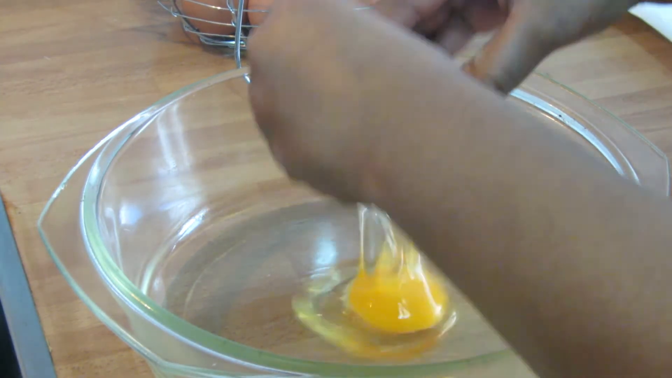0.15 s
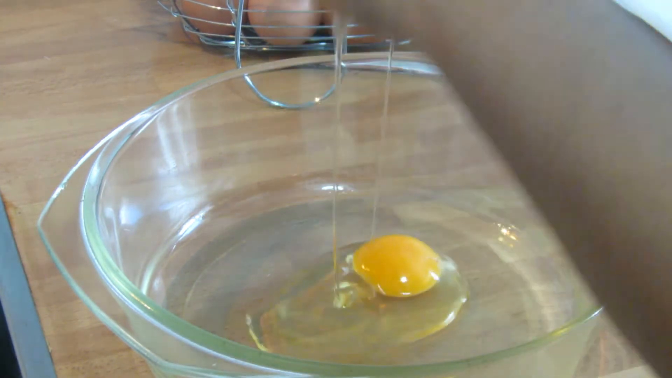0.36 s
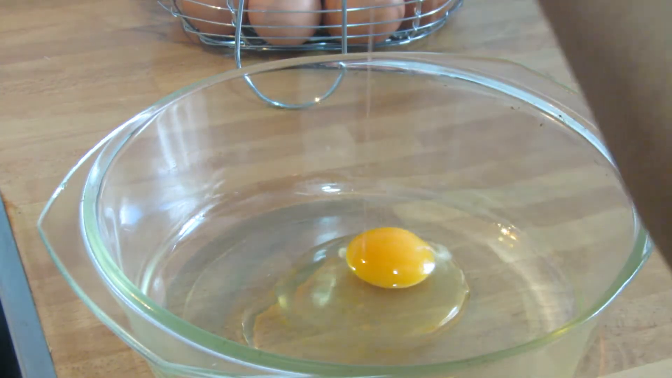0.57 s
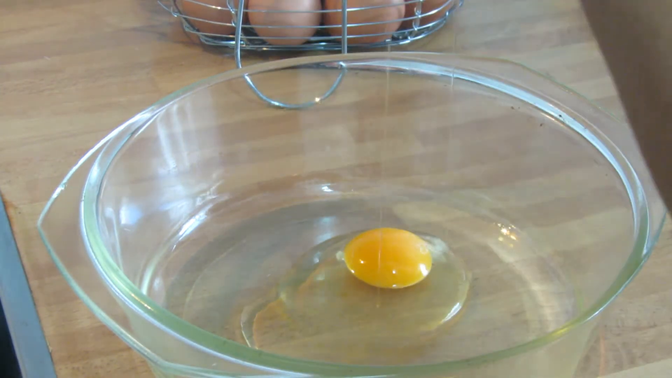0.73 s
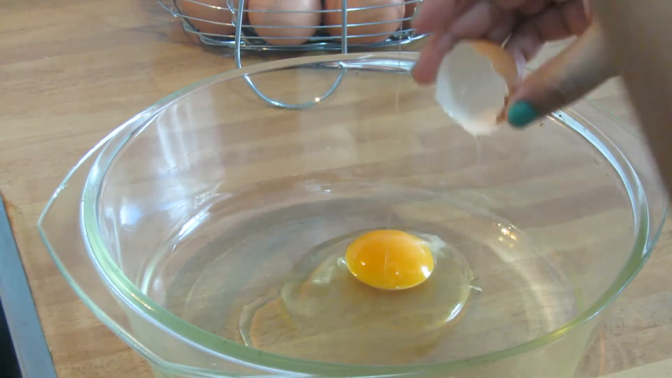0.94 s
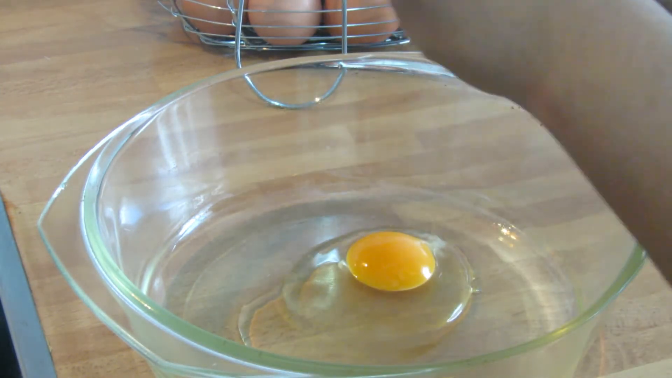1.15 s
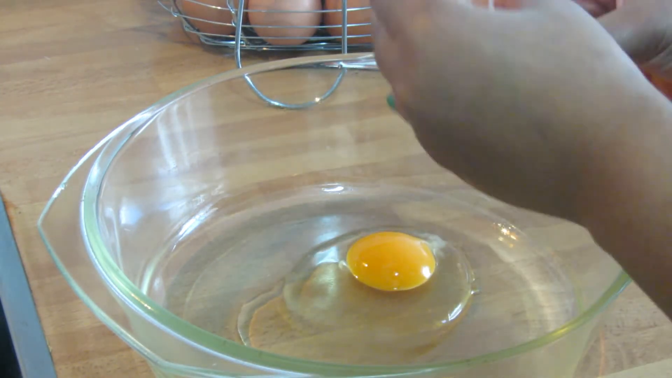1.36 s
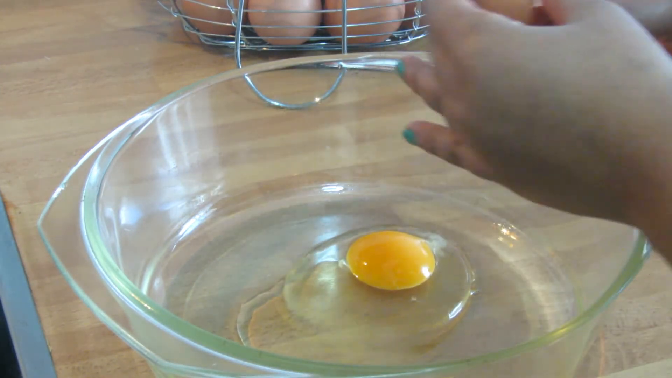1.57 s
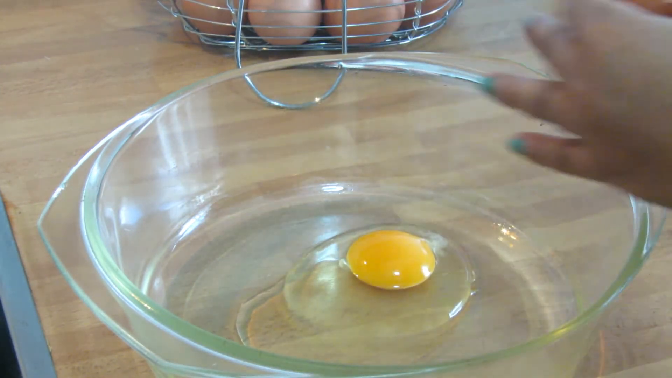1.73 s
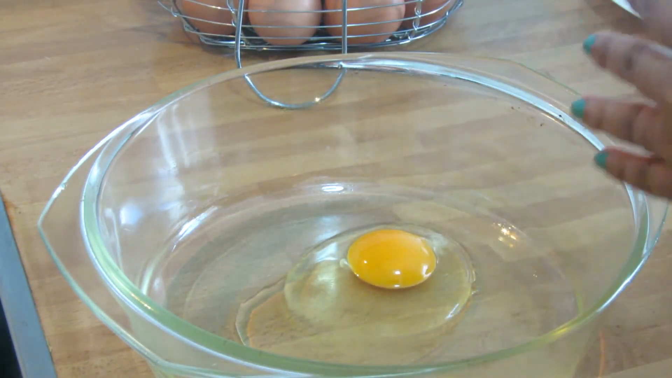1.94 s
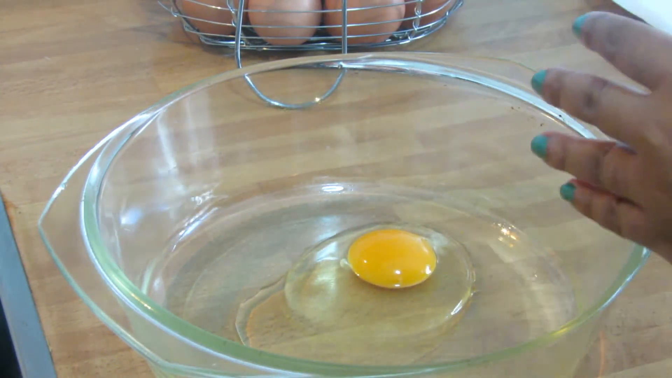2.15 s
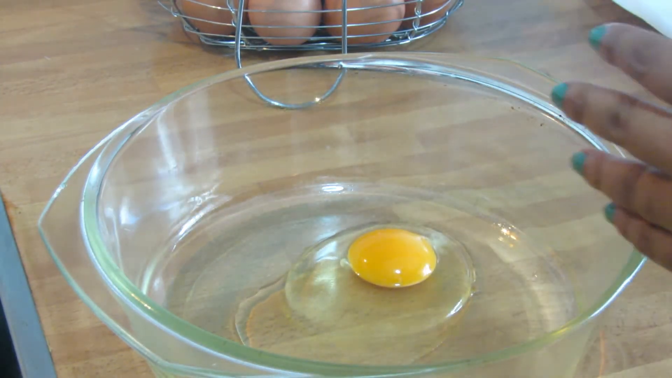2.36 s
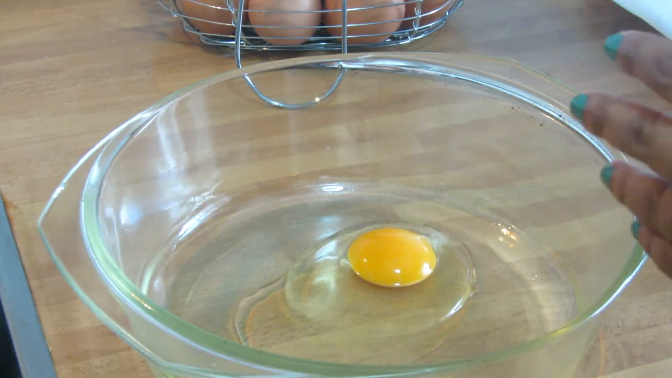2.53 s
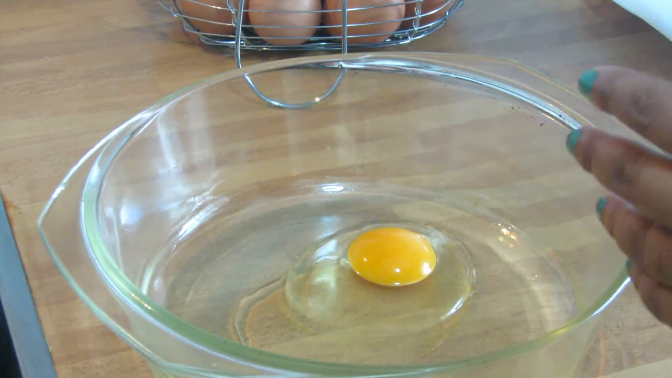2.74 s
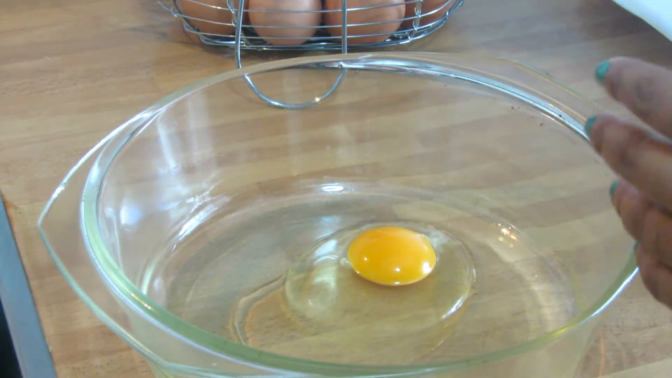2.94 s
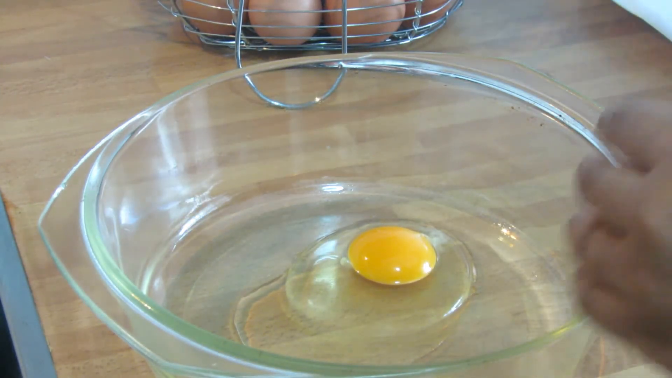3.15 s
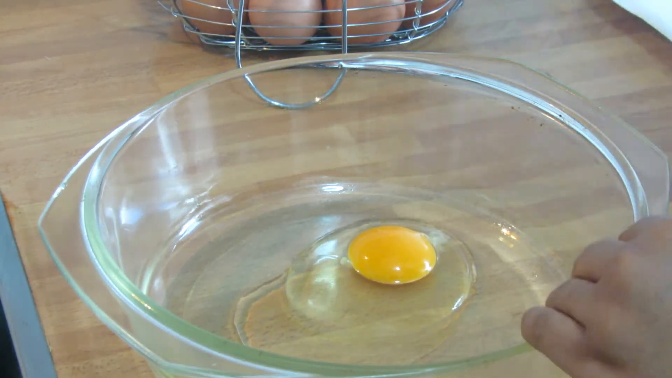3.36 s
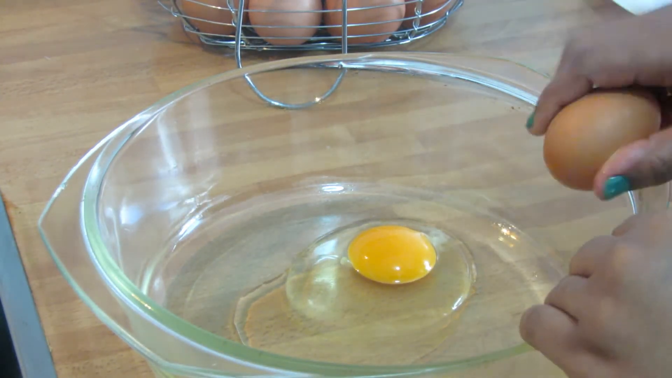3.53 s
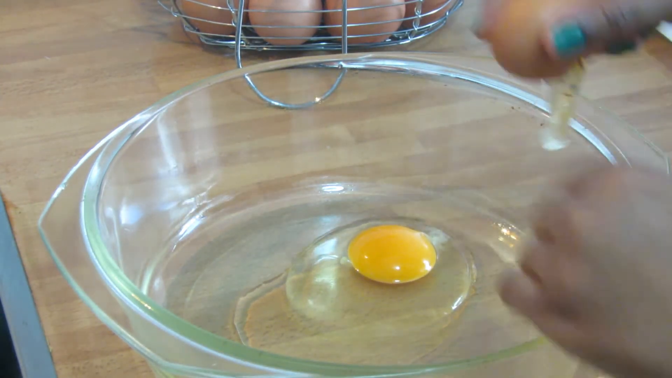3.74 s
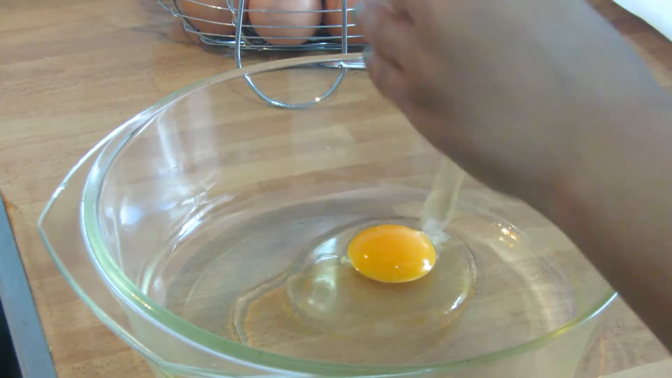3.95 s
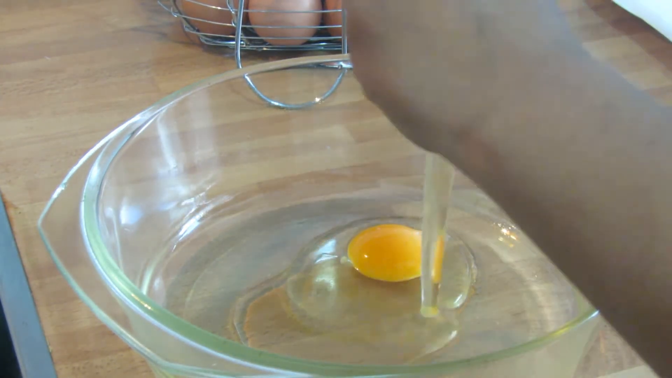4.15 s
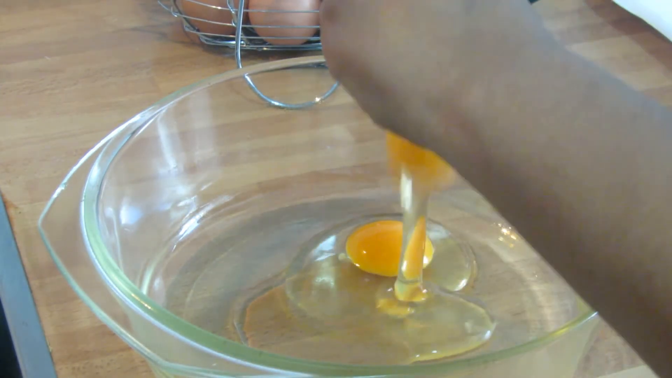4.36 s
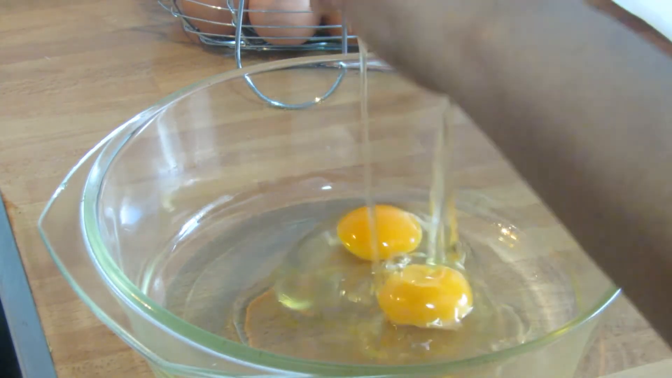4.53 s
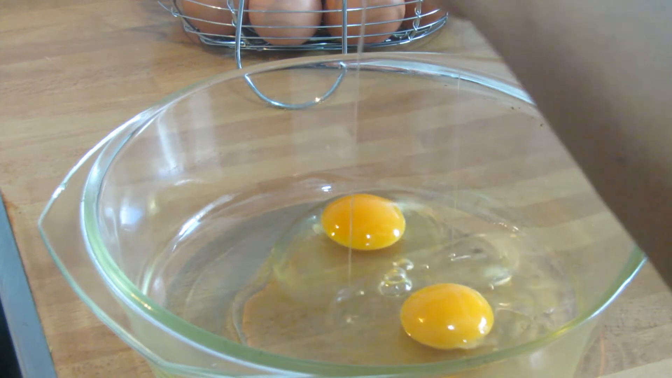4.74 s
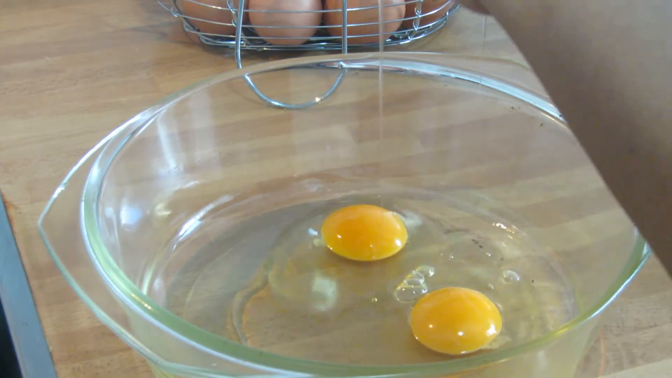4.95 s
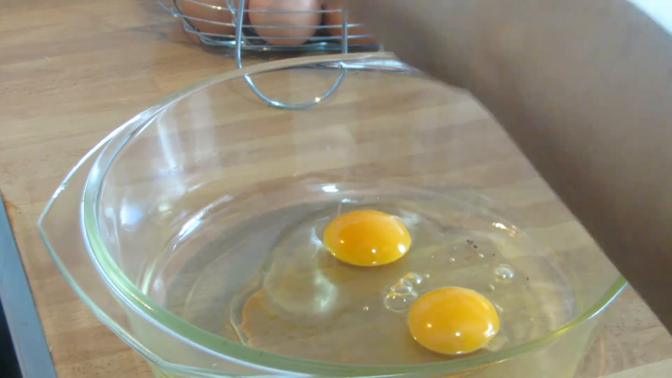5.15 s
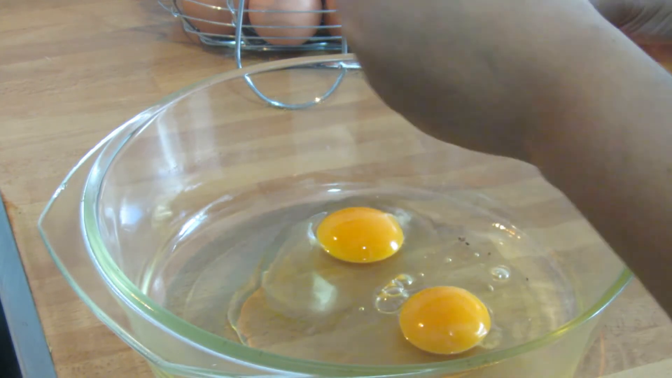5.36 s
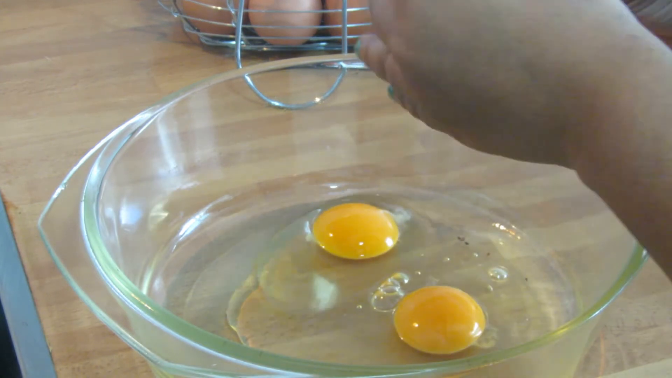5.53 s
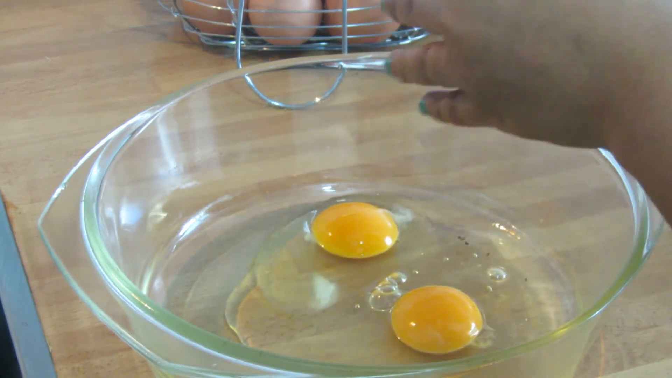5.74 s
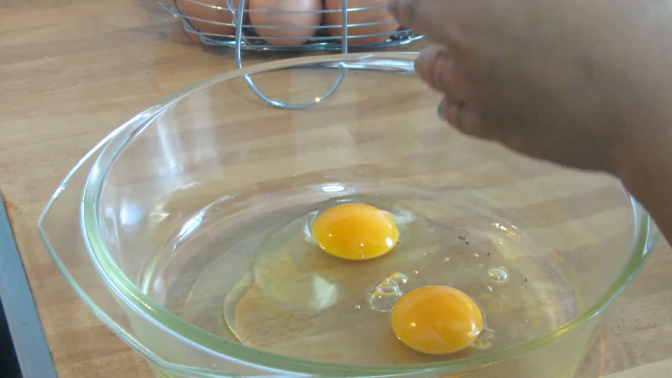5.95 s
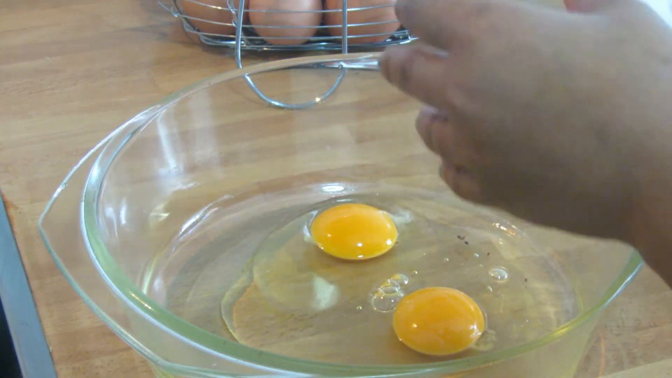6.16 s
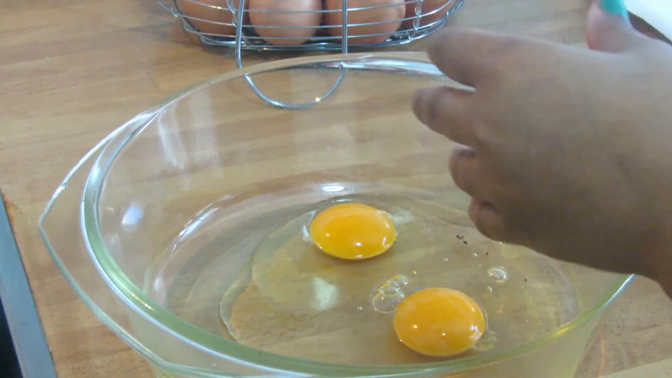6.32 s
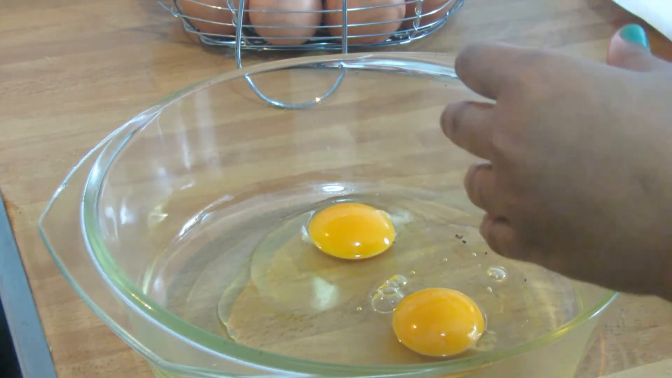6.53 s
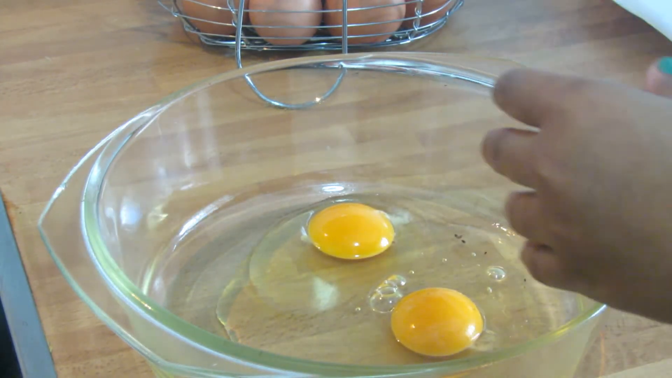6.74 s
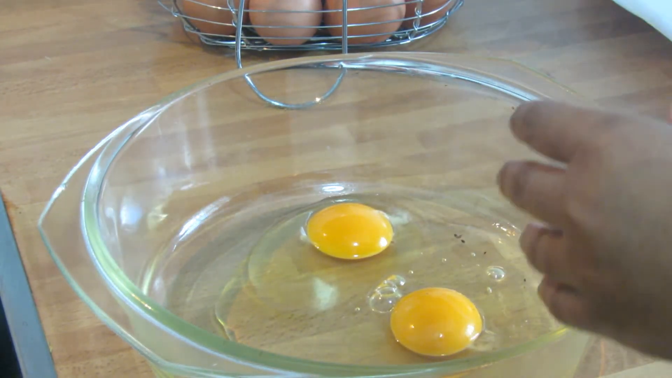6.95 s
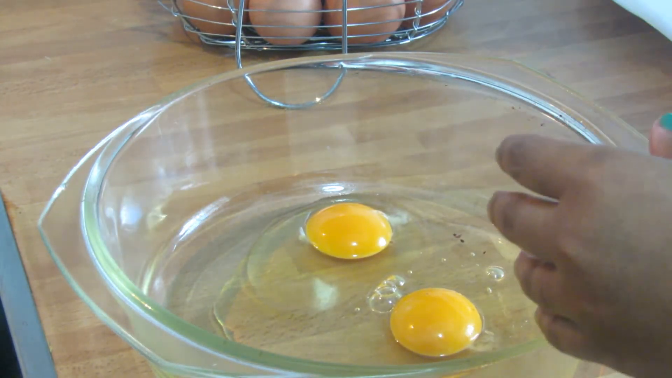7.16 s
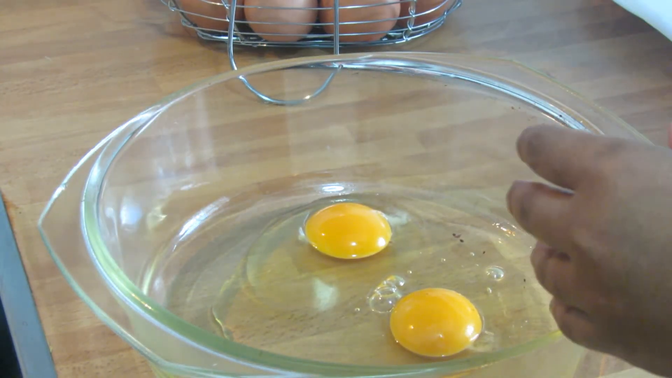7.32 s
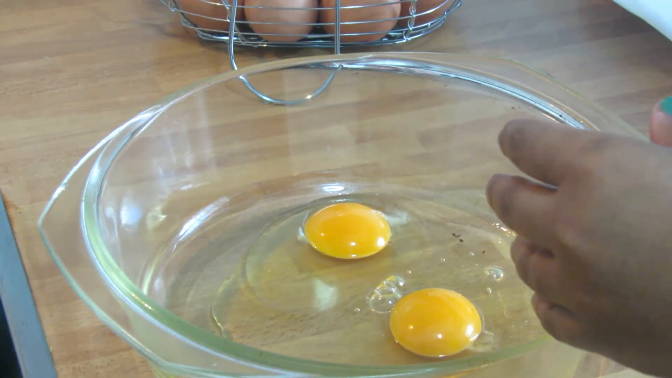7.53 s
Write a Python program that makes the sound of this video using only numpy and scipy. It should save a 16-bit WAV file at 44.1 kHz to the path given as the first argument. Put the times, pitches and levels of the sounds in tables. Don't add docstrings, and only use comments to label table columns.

```python
import sys
import numpy as np
from scipy import signal
from scipy.fft import rfft, irfft, next_fast_len
from scipy.io import wavfile
from scipy.ndimage import uniform_filter1d

SR = 44100
rng = np.random.default_rng(int(sys.argv[2]) if len(sys.argv) > 2 else 0)


def decibels_to_gain(level_db):
    exponent = np.asarray(level_db, float) / 20
    return 10 ** exponent


def int16_out(signal):
    q = np.round(np.clip(np.atleast_2d(signal).T, -1, 1) * 32767)
    wavfile.write(sys.argv[1], SR, q.astype(np.int16))


N = 334719

# start in seconds, peak in dB, bright crack in dB re peak, left-right balance in dB.
BLOWS = [
    (1.996, -3, -18, -13.5),
    (3.5237, 3, -13, -8.5),
    (4.2224, 0.5, -8.5, -8),
]
# fracture T60 in seconds, hardness as a cut-off in Hz.
BLOW_CONTACTS = [
    (0.00089, 3780),
    (0.006, 20100),
    (0.009, 17000),
]
# centre in Hz, width in Hz, height in dB.
DROPPED_SHELL = [(649, 480, -18.5), (1320, 300, -4.5), (1880, 170, 2.5), (2900, 810, -19)]
RIM_CRACK = [(99.6, 30, -21), (600, 110, -7), (1330, 220, -2.5), (1950, 600, -4), (2600, 600, -7),
             (3540, 500, -10), (4870, 680, -5.5), (6140, 1270, 0), (9000, 7900, -16)]
SPLIT_SHELL = [(500, 500, -17), (1050, 170, 2.5), (1287, 170, 3.5), (2500, 1000, -6.5), (3400, 700, -6.5),
               (5500, 800, -2.5), (6600, 870, -9), (10000, 8900, -11)]
# pitch in Hz, level in dB, T60 in seconds.
HEAP_MODES = [(1303, -30, .16), (1745, -35, .25), (1823, -32, .22), (1914, -33, .25), (1965, -30, .23),
              (2030, -34, .24), (2164, -37, .25)]
GLASS_MODES = [(565, -36, .3), (1303, -31, .42), (1321, -34, .4), (1392, -30, .3), (1410, -35, .3),
               (1739, -36, .25), (2175, -39, .22), (3397, -33, .25), (3577, -29, .32), (3590, -38, .25),
               (4790, -35, .22), (5066, -36, .2), (5935, -35, .32), (6045, -35, .27)]

# start in seconds, peak in dB, hollow in Hz, bright crack in dB re peak.
TAPS = [(.0003, -32.5, 1470, -13), (.0035, -23, 2030, -9.5), (.006, -29, 3000, -17),
        (0.486, -37.5, 1040, -23), (0.544, -39, 996, -25), (0.428, -43, 900, -30), (1.242, -30.5, 2980, -8),
        (1.318, -37.5, 2900, -13), (1.4393, -38.5, 1850, -8), (1.4504, -33, 2720, -15),
        (1.471, -26.5, 2670, -9), (1.4752, -29, 2760, -6), (1.565, -37, 2270, -15), (1.5816, -28, 3160, -4),
        (1.6074, -28.5, 1780, -3), (1.707, -37.5, 2580, -4), (1.7473, -37, 3740, -4),
        (2.844, -30, 1330, -20), (3.036, -36, 3150, -20), (4.0816, -37.5, 2660, -25),
        (4.4857, -29.5, 3400, -9), (4.649, -39, 2900, -4), (5.508, -33, 1880, -8.5),
        (5.5516, -30.5, 1750, -15), (5.5645, -37, 1940, -8), (5.5713, -33, 1780, -25),
        (5.575, -36, 1730, -25), (5.59, -41, 2250, -18), (5.609, -41, 1870, -11), (5.608, -36, 2100, -2),
        (5.6243, -23.5, 1920, -1.5), (5.649, -29.5, 2500, 1), (5.79, -37.5, 1880, -13),
        (6.155, -50, 1700, -19), (6.3193, -35, 2000, -25), (6.333, -28, 2340, -23), (6.326, -35, 1820, -24),
        (6.3682, -16.5, 2075, -9), (6.508, -22.5, 1940, 5), (6.5871, -18.5, 2410, -23),
        (6.597, -36, 2480, -29), (6.61, -32, 2500, -27), (6.625, -36, 2500, -27),
        (6.6527, -25.5, 1736, -9.5), (6.655, -30, 2100, -27), (7.2449, -33.5, 1037, -9),
        (7.2621, -25.5, 1880, 1.5), (7.361, -30, 1860, -2), (7.4608, -31, 1500, -9.5)]
# start in seconds, peak in dB, centre in Hz.
SPLINTERS = [(1.411, -35.5, 8500), (1.415, -39, 8000), (1.714, -45, 8000), (2.785, -46, 6500),
             (2.8431, -37, 6500), (2.9386, -39, 9000), (3.025, -40, 9000), (4.169, -29, 9000),
             (4.2205, -26, 8000), (4.448, -31, 10000), (4.737, -34, 9000), (6.458, -44, 9000),
             (6.532, -38, 9000), (5.654, -34, 6000), (5.70, -40, 6000), (1.7612, -23, 7000),
             (4.1336, -30, 9100), (4.1633, -27, 9000), (4.174, -23, 8000), (4.261, -23, 8000),
             (4.304, -23.5, 7600), (4.444, -31, 8400), (4.543, -33, 8500), (4.574, -36.5, 7740),
             (4.7114, -27, 11230), (4.728, -35, 8000), (4.7328, -25.5, 9000), (4.843, -28, 7500),
             (4.8592, -27.5, 7500), (4.91, -36, 8000), (4.962, -20.5, 9330), (4.988, -27, 7000),
             (4.9905, -14, 6400), (4.994, -17.5, 8100), (5.1154, -34, 6900), (5.1404, -28.5, 7900),
             (5.236, -41.5, 7900), (5.294, -48, 8000), (5.366, -45, 7000), (5.392, -37.5, 7200),
             (5.613, -34, 5500), (5.62, -26.5, 5700), (5.676, -34, 5600), (5.8212, -36, 7460),
             (5.824, -39, 7440), (5.905, -47, 7900), (6.309, -48, 8500), (6.361, -36, 9500),
             (6.374, -28, 8000), (6.5087, -23, 3680), (6.368, -31, 11500), (6.5105, -35, 11600),
             (7.261, -36, 11500), (6.5087, -38, 11550), (7.265, -30, 7000)]
TAP_CRACK_HZ = 8000
SPLINTER_HZ, SPLINTER_RING_DB = 2800, -7.5
TAP_CYCLES, SPLINTER_CYCLES = 45, 9

# peak time in seconds, level in dB, rise in seconds, fall in seconds,
# skin hiss in dB re level.
WIPES = [(0.512, -46.5, 0.086, 0.15, -2), (0.946, -43, 0.047, 0.22, 1), (1.79, -24.5, 0.037, 0.17, 1),
         (2.716, -38, 0.14, 0.074, -5), (2.85, -30.5, 0.0058, 0.22, -6.5), (3.21, -34.5, 0.059, 0.11, -3),
         (3.838, -51, 0.034, 0.15, -7.5), (.3, -50, 0.092, 0.18, -1.5), (1.105, -44.5, .015, 0.16, -2.5),
         (4.23, -31.5, .006, .12, 2), (4.14, -40.5, 0.094, 0.44, -2.5), (4.085, -51, 0.021, .1, 6),
         (6.16, -46.5, 0.011, 0.15, -8), (1.755, -38.5, 0.0071, 0.17, 7.5), (6.85, -49.5, 0.13, 0.068, -4),
         (7.1, -49.5, 0.22, 0.46, -2.5), (2.56, -60, 0.024, 0.18, 6), (6.512, -37, .004, .1, -4),
         (4, -49, .006, 0.16, -4), (4.715, -42.5, .01, 0.098, -1), (4.99, -35, 0.064, 0.12, -17),
         (6.37, -27, 0.017, 0.071, -4), (7.26, -41.5, 0.02, 0.46, -1), (7.37, -39, 0.048, 0.24, -7.5)]
# peak time in seconds, level in dB, rise in seconds, fall in seconds,
# pitch of the hollow in Hz.
CRUSHES = [(.005, -33, 0.011, 0.08, 1900), (.2, -56, 0.3, 0.45, 1880), (1.25, -42.5, 0.017, 0.099, 2940),
           (1.625, -43, .02, .09, 1660), (1.484, -31.5, 0.068, 0.12, 2330), (1.59, -39.5, 0.03, 0.13, 3000),
           (4.5, -42.5, 0.049, 0.14, 2960), (4.85, -50, 0.046, 0.15, 1780), (5.45, -47.5, 0.21, .2, 2470),
           (5.57, -26, 0.033, 0.14, 2100), (5.65, -31.5, 0.14, 0.074, 2270), (5.75, -44, 0.046, 0.25, 2160),
           (6.345, -31, 0.034, 0.051, 2100), (6.59, -20, 0.0054, 0.043, 2600),
           (6.655, -27.5, 0.0097, 0.037, 2200), (6.9, -72, 0.42, 0.21, 2340)]
# peak time in seconds, level in dB, rise in seconds, fall in seconds.
RUSTLES = [(.29, -58, 0.056, 0.2), (1.1, -58, 0.011, 0.31), (1.484, -38.5, 0.049, 0.11),
           (1.666, -52, 0.074, 0.12), (3.3, -46.5, 0.15, 0.24), (4.21, -49.5, 0.2, 0.21),
           (4.46, -55, 0.046, .15), (4.72, -44.5, 0.049, 0.084), (4.83, -47, 0.23, 0.13),
           (5.4, -56, 0.21, 0.71), (5.56, -40, 0.028, 0.1), (5.618, -42, 0.016, 0.16),
           (5.69, -39.5, .05, 0.033), (4.23, -27, .008, 0.11), (4.992, -40, 0.01, 0.16),
           (6.51, -32, 0.0043, 0.12), (6.6, -62, .03, .15), (6.95, -70, 0.66, 0.87)]
# centre in Hz, width in Hz, level in dB.
SHELL_CUP = [(1500, 170, 3), (1780, 110, 1.5), (1940, 170, 1.5), (2480, 450, 3), (2800, 99, 1.5),
             (3100, 280, 0), (3340, 200, -15)]
# frequency in Hz, level in dB per Hz.
SKIN_HISS = [(3500, -1.5), (5800, -2.5), (7000, -4), (9500, -11), (12000, -15), (15500, -17.5)]
FLAKES = [(2500, -33), (4300, -6), (5600, 0.5), (7000, -2), (11000, -11), (15500, -12)]
WIPE_HZ, WIPE_FOCUS_DB, CRUSH_FOCUS_DB = 2100, 2, 29.5

# peak time in seconds, level in dB, rise in seconds,
# fall in seconds, centre in Hz.
KNOCKS = [(.15, -60.5, 0.31, 0.65, 730), (.49, -47, 0.02, .2, 950), (.55, -48.5, .02, .2, 994),
          (1.153, -45.5, .012, .12, 823), (1.25, -45, 0.0148, 0.22, 750), (1.77, -33.5, .025, 0.25, 730),
          (2.742, -42.5, 0.2, 0.13, 535), (2.848, -27, 0.0087, 0.15, 407), (3.23, -43, 0.14, 0.12, 692),
          (4.21, -47, 0.22, .2, 947), (4.77, -30.5, 0.0048, 0.097, 522), (4.8, -31, 0.036, 0.1, 600),
          (5.04, -48, 0.088, 0.098, 600), (5.45, -58, .3, .3, 513), (6.17, -64.5, .15, .21, 714),
          (6.33, -39.5, 0.018, 0.12, 955), (6.36, -35.5, 0.043, 0.17, 687), (6.55, -44, 0.075, .2, 785),
          (7.12, -55, 0.09, 0.31, 1180), (7.27, -41.5, 0.049, 0.18, 595), (7.37, -42, .04, .2, 550),
          (7.54, -42.5, 0.5, .15, 416)]
# peak time in seconds, board level in dB, rise in seconds,
# fall in seconds, cabinet boom in dB re board.
LEANS = [(.504, -55.5, 0.23, 0.46, -3.5), (1.27, -53, 0.51, 0.5, -4.5), (1.77, -39.5, 0.041, 0.39, -10.5),
         (2.742, -43.5, 0.24, 0.16, 1), (2.848, -28.5, 0.0073, 0.13, -0.5), (3.264, -40, 0.16, 0.16, -12.5),
         (3.527, -46.5, 0.005, 0.2, 4), (4.224, -52.5, .004, 0.035, 1), (4.1, -60, 0.33, 0.27, -5),
         (4.8, -23, 0.01, 0.083, -17), (5.12, -59, 0.23, 0.18, -18), (5.49, -60, 0.34, 0.19, -19),
         (6.0, -63, 0.41, 0.21, -6), (6.17, -65, 0.084, 0.089, 13), (6.36, -44.5, 0.039, 0.23, -8),
         (7.03, -66.5, 0.57, .4, 6), (7.33, -47, 0.33, 0.48, 1.5), (7.54, -47.5, 0.33, 0.39, 3.5)]
# centre in Hz, width in Hz, level in dB.
TOP_MODES = [(374, 47, -0.5), (452, 71, -1), (522.4, 74, -3), (674, 71, -2.5), (900, 210, 2),
             (1042, 180, 5), (1250, 410, 3.5)]
CABINET = [(100, 74, 0)]
BOARD = [(174, 13, -2.5), (241.3, 34, -1.5), (268, 110, 2)]
# start in seconds, peak in dB, pitch in Hz, T60 in seconds.
THUDS = [(2.845, -25, 409, 0.095), (4.761, -19, 182, 0.056), (4.786, -16.5, 201, 0.084),
         (4.788, -21, 687, 0.054), (4.775, -24, 382, .07), (4.806, -26, 328, 0.071),
         (4.795, -17.5, 538, 0.051), (4.819, -28, 231, 0.11), (4.822, -26, 418, 0.1),
         (4.828, -24.5, 670, 0.062), (4.839, -35, 413, .05), (4.895, -47, 713, 0.068),
         (4.858, -25, 228, 0.066), (4.895, -31, 222, 0.063), (5.065, -43.5, 432, 0.19),
         (5.366, -44.5, 538, 0.16), (7.325, -36, 104, 0.1), (7.429, -34, 109, 0.11)]

# start in seconds, peak in dB.
JINGLES = [(1.4707, -52), (1.49, -54), (2.8513, -52), (2.8772, -51), (2.8847, -48), (2.9386, -47),
           (3.0244, -53), (7.2607, -48), (7.2925, -45), (7.334, -56), (7.36, -52), (7.372, -53)]
# pitch in Hz, level in dB, T60 in seconds.
WIRES = [(5010, -8, .05), (6300, -3, .05), (6710, -5, .05), (9480, -3, .06), (10700, -4, .08),
         (11200, -4, .1), (12100, -4, .1), (13000, -4, .1), (13900, -8, .16), (14200, -9, .12),
         (15350, -12, .1)]
WIRE_SPREAD_DB = 5

# frequency in Hz, T60 in seconds.
ROOM_T60 = [(100, 0.2), (400, 0.34), (1500, 0.33), (4000, 0.33), (8000, 0.25), (15000, 0.11)]
# frequency in Hz, level in dB per Hz.
AIR = [(12, -39.5), (20, 3.5), (146, 2.5), (328, -1.5), (2020, -8), (4940, -12), (13900, -24.5),
       (16000, -24.5)]
# frequency in Hz, left-right likeness from -1 to 1.
AIR_ALIKE = [(25, -0.3), (60, 0.03), (200, -0.35), (1000, 0.58), (10000, 0.74)]
# centre in Hz, width in Hz, level in dB.
FRIDGE = [(98.6, 23, -74.5), (199.6, 12, -74)]
# time of the blow in seconds, depth in dB.
DUCKS = [
    (2.001, 10),
    (3.521, 3.5),
    (4.22, 3.5),
]
AIR_DB, GAIN_DB = -54.5, 5.5
DUCK_DEEPEST_S, DUCK_WIDTH_S = 0.28, 0.33
MOTOR_HZ, MOTOR_DB = 199.7, -67.5
HANDS_PAN_DB, COUNTER_PAN_DB, ECHO_PAN_DB = -2.5, -5.5, -3


def blows():
    out, t = np.zeros((2, N)), np.arange(30000) / SR
    colours = (DROPPED_SHELL, RIM_CRACK, SPLIT_SHELL)
    for (s, peak_db, bright_db, pan_db), peaks, (t60, cut_hz) in zip(BLOWS, colours, BLOW_CONTACTS):
        wide = [(hz, width, db + 10 * np.log10(width)) for hz, width, db in peaks]
        fracture = (t == 0) + 0.1 * burst(t, t60)[0] + 1e-18
        contact = signal.butter(2, cut_hz, fs=SR, output="sos")
        snap = resonances(signal.sosfilt(contact, fracture), wide)
        snap = snap / np.abs(snap).max()
        blow = snap + decibels_to_gain(bright_db - 1.5) * crack(t, 0.0084)
        add(out, s, panned(decibels_to_gain(peak_db + 1.0) * blow, pan_db))
    for (s, *_), modes in zip(BLOWS, (HEAP_MODES, GLASS_MODES)):
        ringing = sum(decibels_to_gain(db - 60 * t / t60) * np.sin(2 * np.pi * hz * t) for hz, db, t60 in modes)
        add(out, s, panned(ringing, -1.0))
    return out


def ticks():
    out, t = np.zeros((2, N)), np.arange(2000) / SR
    events = [(*row, TAP_CRACK_HZ, TAP_CYCLES) for row in TAPS]
    for s, db, crack_hz in SPLINTERS:
        knock_hz = SPLINTER_HZ * rng.uniform(0.85, 1.1)
        events.append((s, db + SPLINTER_RING_DB, knock_hz, -SPLINTER_RING_DB, crack_hz, SPLINTER_CYCLES))
    for s, peak_db, hz, bright_db, crack_hz, cycles in events:
        cluster = hz * np.array([[1], [1.1], [0.9]])
        partials = np.array([[.65], [.35], [.25]]) * np.sin(2 * np.pi * cluster * t)
        ring = partials.sum(0) * decibels_to_gain(-60 * t * hz / cycles)
        tick = ring + decibels_to_gain(bright_db + 8.5) * crack(t, 0.021, crack_hz)
        add(out, s, panned(decibels_to_gain(peak_db) * tick, HANDS_PAN_DB))
    return out


def crack(t, t60, hz=7000, apart=0.42, fizz=0.46):
    bright = signal.butter(3, [hz * 0.63, min(hz * 1.62, 19000)], "band", fs=SR, output="sos")
    mid, side = fizz * burst(t, t60)
    return signal.sosfilt(bright, 0.45 * (t == 0) + mid + apart * side * [[1], [-1]])


def hands():
    wipe, skin_db = gestures(WIPES)
    crush, hollow_hz = gestures(CRUSHES)
    rustle, = gestures(RUSTLES)
    fractures = grains(1500, spread_db=3.0)
    cup = wipe * resonances(fractures, SHELL_CUP, WIPE_HZ, WIPE_FOCUS_DB)
    cup = cup + crush * resonances(fractures, SHELL_CUP, hollow_hz, CRUSH_FOCUS_DB)

    def hiss():
        skin = coloured(grains(6000, spread_db=3.5), [(1800, -53.0)] + SKIN_HISS)
        flakes = coloured(grains(2500, spread_db=2.5), FLAKES)
        return wipe * decibels_to_gain(skin_db) * skin + rustle * flakes

    mid, side = hiss(), hiss()
    return panned(decibels_to_gain(-7.0) * cup + decibels_to_gain(-3) * (mid + 0.77 * side * [[1], [-1]]), HANDS_PAN_DB)


def counter():
    lean, boom_db = gestures(LEANS)
    knock, knock_hz = gestures(KNOCKS)
    slips = grains(300, spread_db=3.0)
    boom = resonances(resonances(slips, CABINET), [(102, 45, 0)])
    low = decibels_to_gain(-1.5 + boom_db) * lean * boom
    board = decibels_to_gain(-3.0) * lean * resonances(resonances(slips, BOARD), [(233.3, 70, 0)])
    top = decibels_to_gain(-0.5) * knock * resonances(grains(700, spread_db=0.0), TOP_MODES, knock_hz, fall_db=8.0)
    return panned(low + board + top, COUNTER_PAN_DB)


def thuds():
    out, t = np.zeros((2, N)), np.arange(12000) / SR
    for s, peak_db, hz, t60 in THUDS:
        swell = 1 - np.exp(-t / 0.0014)
        ring = decibels_to_gain(peak_db - 60 * t / t60) * swell * np.sin(2 * np.pi * hz * t)
        add(out, s, panned(ring, COUNTER_PAN_DB))
    return out


def basket():
    out, t = np.zeros((2, N)), np.arange(9000) / SR
    hz, level_db, t60 = np.transpose(WIRES)[:, :, None]
    for s, peak_db in JINGLES:
        uneven_db = WIRE_SPREAD_DB * rng.standard_normal(hz.shape)
        ring = decibels_to_gain(peak_db + level_db + uneven_db - 60 * t / t60) * np.sin(2 * np.pi * hz * t)
        add(out, s, panned(ring.sum(0), HANDS_PAN_DB))
    return out


def kitchen(x, gap_s=0.0014):
    t = np.arange(SR // 2) / SR
    tail, edges = 0, 60 * 2 ** np.arange(0, 8.4, .5)
    for low, high in zip(edges, edges[1:]):
        half_octave = signal.butter(2, [low, high], "band", fs=SR, output="sos")
        band = signal.sosfilt(half_octave, rng.standard_normal((2, len(t))))
        tail = tail + band * decibels_to_gain(-60 * t / at_hz(ROOM_T60, np.sqrt(low * high)))
    tail = tail * np.clip(t / gap_s, 0, 1)
    tail = tail + 0.069 * tail[::-1]
    tail = tail / np.sqrt(np.sum(tail ** 2) / 2)
    return signal.fftconvolve(x, tail, axes=1)[:, :N]


def air():
    side_db = []
    for hz, alike in AIR_ALIKE:
        alike = np.clip(alike, -.9, .9)
        side_db.append((hz, 10 * np.log10((1 - alike) / (1 + alike))))
    side_spectrum = [(hz, db + at_hz(side_db, hz)) for hz, db in AIR]
    mid = coloured(rng.standard_normal(N), AIR)
    side = coloured(rng.standard_normal(N), side_spectrum)
    tone = decibels_to_gain(AIR_DB - 6.0) * (mid + decibels_to_gain(6.0) * side * [[1], [-1]])
    hum = sum(decibels_to_gain(db) * resonances(rng.standard_normal(N), [(hz, width, 0)]) for hz, width, db in FRIDGE)
    t = np.arange(N) / SR
    hum = hum + decibels_to_gain(MOTOR_DB) * np.sin(2 * np.pi * MOTOR_HZ * t)
    ducking_db = sum(db * np.exp(-((t - s - DUCK_DEEPEST_S) / DUCK_WIDTH_S) ** 2) for s, db in DUCKS)
    return (panned(tone, -0.92) + panned(hum, -2)) * decibels_to_gain(GAIN_DB - ducking_db)


def gestures(rows):
    t = np.arange(0, N + 32, 32) / SR
    s, db, rise, fall, *rest = np.transpose(rows)[:, :, None]
    distance = np.where(t < s, (s - t) / np.abs(rise), (t - s) / np.abs(fall))
    power = decibels_to_gain(2 * db - 40 * distance) + 1e-30
    total = power.sum(0)
    curves = [np.sqrt(total)] + [(power * column).sum(0) / total for column in rest]
    return [np.interp(np.arange(N) / SR, t, curve) for curve in curves]


def grains(per_s, spread_db):
    sizes = decibels_to_gain(spread_db * np.minimum(rng.exponential(1, N), 4)) * rng.choice([-1, 1], N)
    return sizes * (rng.random(N) < per_s / SR) + 1e-18


def burst(t, t60):
    shape = decibels_to_gain(-60 * t / t60)
    x = shape * rng.standard_normal((2, len(t)))
    for turn in range(4):
        spectrum = rfft(x)
        x = irfft(spectrum / (np.abs(spectrum) + 1e-12), len(t))
        x = shape * x / np.sqrt(np.abs(uniform_filter1d(x ** 2, size=15)) + 1e-12)
    return x


def resonances(x, peaks, centre_hz=None, fall_db=0):
    out, power = 0, 0
    for k, (hz, width, db) in enumerate(peaks):
        r = np.exp(-np.pi * width / SR)
        b = (1 - r * r) / 2 * np.array([1, 0, -1])
        a = [1, -2 * r * np.cos(2 * np.pi * hz / SR), r * r]
        if centre_hz is not None:
            db = db - fall_db * np.abs(np.log2(hz / centre_hz))
        gain = decibels_to_gain(db)
        out = out + (-1) ** k * gain * signal.lfilter(b, a, x) / np.sqrt(width)
        power = power + gain ** 2
    return rms_one(out / np.sqrt(power))


def coloured(x, spectrum):
    size = next_fast_len(N)
    hz = np.arange(size // 2 + 1) * SR / size
    return rms_one(irfft(rfft(x, size) * decibels_to_gain(at_hz(spectrum, hz)), size)[:N])


def at_hz(points, hz):
    points = np.array(points)
    return np.interp(np.log(hz + 1), np.log(points[:, 0]), points[:, 1])


def rms_one(x):
    return x / np.sqrt(np.mean(x ** 2) + 1e-20)


def panned(x, db):
    return x * decibels_to_gain([[db / 2], [-db / 2]])


def add(out, s, sound):
    at = round(s * SR)
    out[:, at:at + sound.shape[1]] += sound[:, :N - at]


def scene():
    big = blows()
    small = ticks() + thuds() + basket()
    rubbing = hands() + counter()
    sent = decibels_to_gain(-1.0) * small + decibels_to_gain(-4.0) * big + decibels_to_gain(-7.0) * rubbing
    echoes = kitchen(sent.mean(axis=0, keepdims=True))
    return small + big + rubbing + panned(echoes, ECHO_PAN_DB) + air()


def roll_off(x):
    return signal.sosfilt(signal.butter(12, 16470, fs=SR, output="sos"), x)


def record(dry):
    cut = signal.sosfilt(signal.cheby2(10, 40, 16150, fs=SR, output="sos"), dry)
    return roll_off(np.clip(cut, -1, 1))


dry = scene()
out = record(dry)
int16_out(out)
```